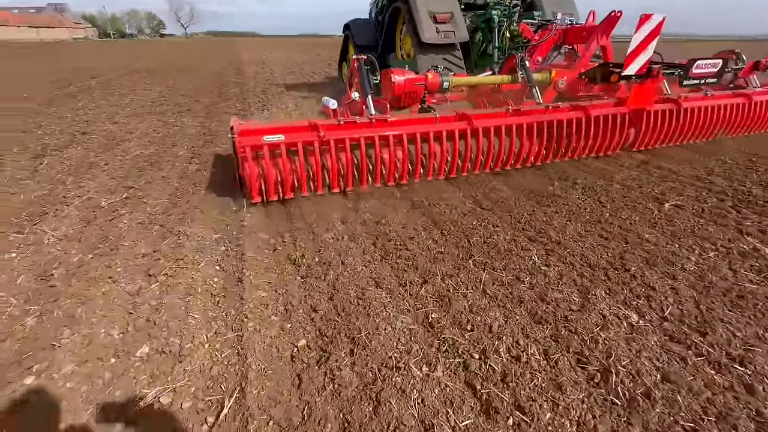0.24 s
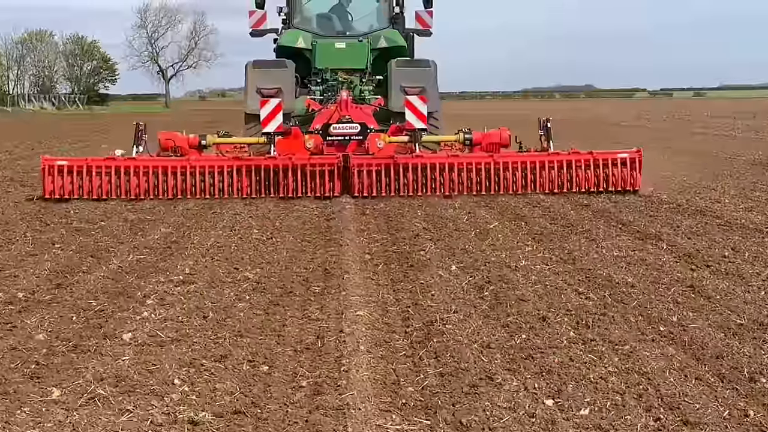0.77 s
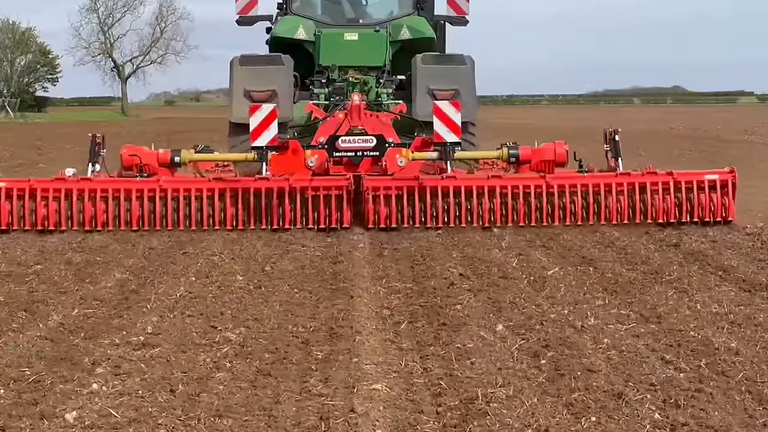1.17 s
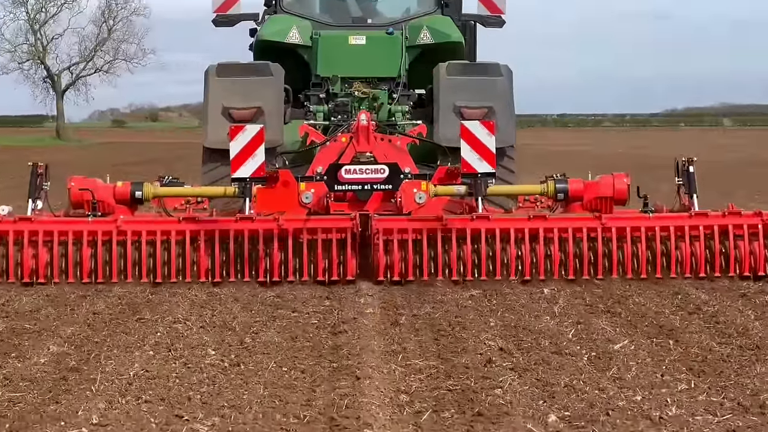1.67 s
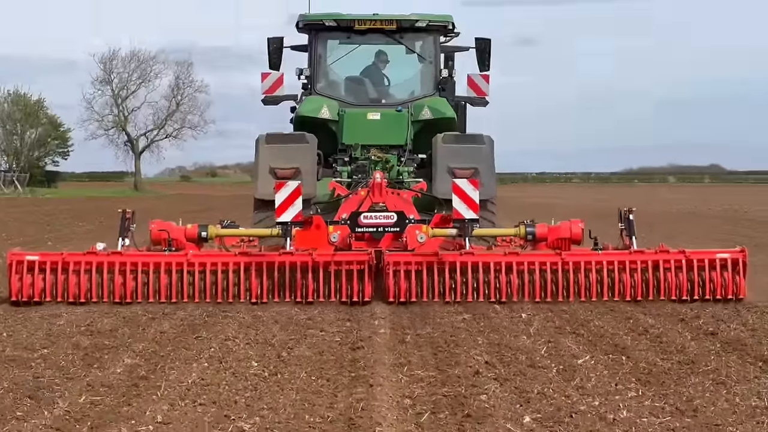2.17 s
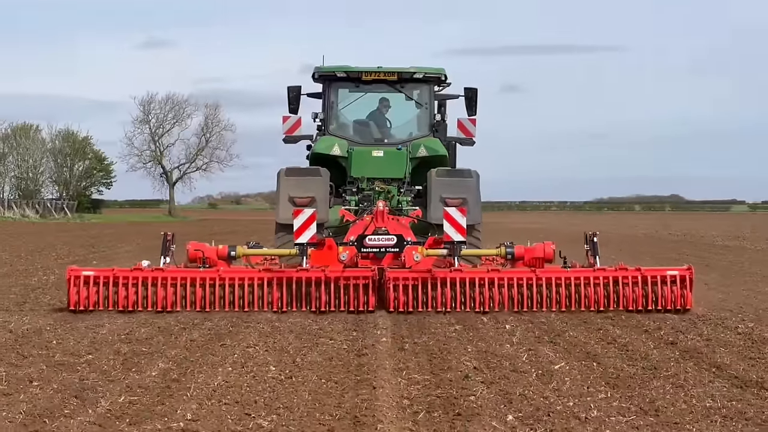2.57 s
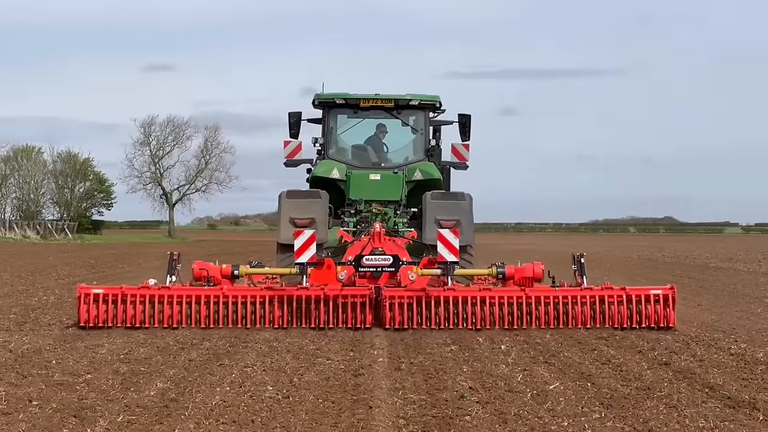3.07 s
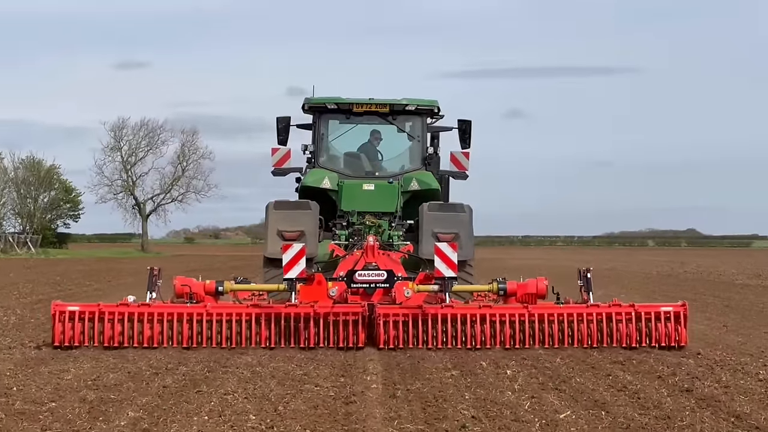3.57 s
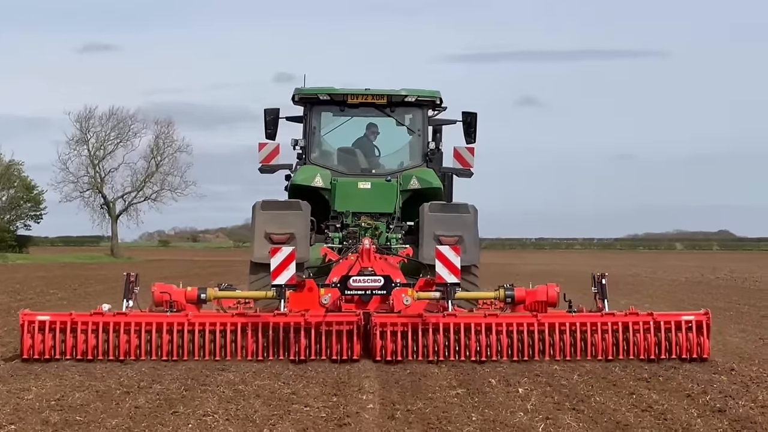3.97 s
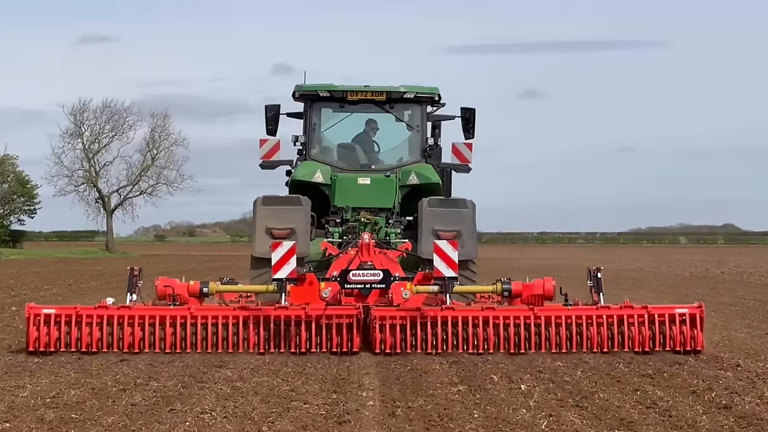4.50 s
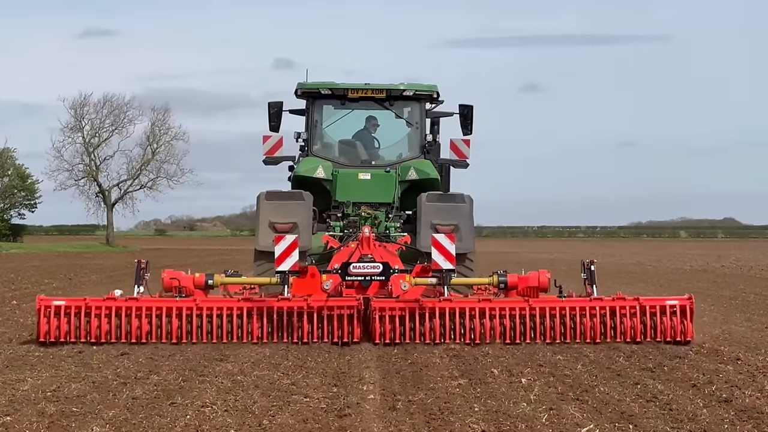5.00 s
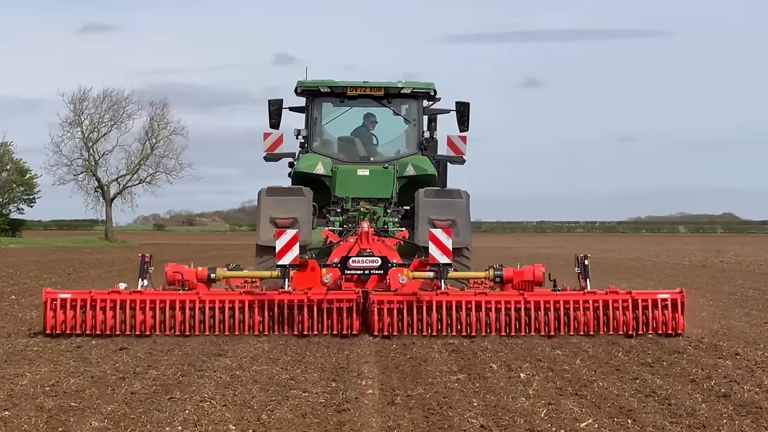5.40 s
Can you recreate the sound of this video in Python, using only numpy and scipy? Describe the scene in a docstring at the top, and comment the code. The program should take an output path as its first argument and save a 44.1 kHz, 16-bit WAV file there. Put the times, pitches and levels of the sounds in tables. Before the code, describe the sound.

From 0 to 0.3 s, a close, loud, coarse churn of rotors, steel and clods, with a short hiss of soil at the very start and another near 0.25 s. It cuts abruptly to a position behind the machine. From there a steady gear hum near 410 Hz, with fluttering, swelling overtones, and quiet engine tones sit within dense metallic clatter, rattle and dry crumbling soil, roughened by irregular little bursts. Deep wind gusts thump the microphone from about 0.35 to 2.7 s, with a lighter one near 3.1 s, then subside apart from a brief low buffet at 4.25 s. A stone scrapes and clinks at 1.1 s, with fainter ones near 2.9, 3.2 and 4.9 s. From about 2.6 to 3.7 s the hum thins and the treble dulls; both return by 3.85 s. The work continues steadily, slightly receding overall, to the end around 5.6 s. Open air, no room echo.

```python
"""Tractor with power harrow

A tractor pulls a power harrow through dry soil at steady speed, heard close beside it, then from behind.
Gears whine as fluttering tooth-mesh harmonics over diesel tones locked to the engine cycle.
Random knocks, coloured by the steel and the microphone, make churn, clatter, rattle and crumbling soil.
From behind, stones clink as scrapes with a ring, and wind buffets the microphone as low shaped noise.
The hum thins and the treble dulls for about a second midway, then both return."""
import sys
import numpy as np
from scipy import signal
from scipy.fft import rfft, irfft
from scipy.io import wavfile
from scipy.ndimage import uniform_filter1d, map_coordinates

SR = 44100
rng = np.random.default_rng(int(sys.argv[2]) if len(sys.argv) > 2 else 0)


def generate_wav(signal):
    """Clip the signal to [-1, 1] and save it as 16-bit WAV at the path in sys.argv[1]."""
    frames = np.transpose(np.atleast_2d(signal))
    scaled = np.clip(frames, -1, 1) * 32767
    pcm = np.round(scaled).astype(np.int16)
    wavfile.write(sys.argv[1], SR, pcm)


N = 249165   # length in samples

BEHIND_FROM_S = 0.299   # close beside before this moment, behind after it
TEETH_PER_CYCLE = 25   # gear teeth meeting in one four-stroke cycle

# Spectrum of crumbling and spraying soil as the microphone colours it, with treble peaks near 8, 11
# and 13.6 kHz. Each row: frequency in Hz, relative density in dB per Hz.
SOIL_SPECTRUM = [(2000, -7), (4000, 4.5), (5200, 2), (6800, -7), (8300, -3), (9200, -16), (11200, -8.5),
                 (12300, -18), (13600, -14.5), (15700, -24)]
# Thin, dull passage. Each row: time in seconds, thinning of the hum (1 is full, below 0 is fuller),
# dulling of the work noise (1 is full, below 0 is brighter).
DULLING_CURVE = [(1.95, 0, -.1), (2.48, 0, 0.27), (2.66, .95, 1), (3.42, 1, 0.76), (3.68, 0.14, 0.86),
                 (3.84, 0.14, -0.028), (4.25, 0, -0.19), (4.95, 0, -0.12), (5.15, 0.1, 0.025),
                 (5.45, -.15, -0.13)]


def from_db(db):
    """Decibels to gain."""
    return 10 ** (np.asarray(db) / 20)


def rms_one(x):
    """Scale to unit rms."""
    return x / np.sqrt(np.mean(x ** 2) + 1e-20)


def in_time(rows):
    """Draw each column of a timed table as a curve, sample by sample."""
    s, *columns = np.transpose(rows)
    return [np.interp(np.arange(N) / SR, s, column) for column in columns]


def passing(level, depth):
    """A layer's level in dB: a steady trend over time, less its loss at the given thinning or dulling."""
    start_db, db_per_s, loss_db = level
    return start_db + db_per_s * np.arange(N) / SR - loss_db * depth


def drift(rate_hz):
    """Smooth random wandering of spread 1: noise through two equal low-pass poles, drawn every 20 samples."""
    pole = np.exp(-40 * np.pi * rate_hz / SR)
    noise = rng.standard_normal(N // 20 + 4002)
    slow = signal.lfilter([1], [1, -2 * pole, pole * pole], noise)[4000:]   # skip the filter's start-up
    return np.interp(np.arange(N) / 20, np.arange(len(slow)), rms_one(slow))


def colour(x, spectrum, resonances=()):
    """Give a sound a broad spectrum with resonant lifts or dips on top; rms 1."""
    hz = np.maximum(np.arange(N // 2 + 1) * SR / N, 1)
    points_hz, points_db = np.transpose(spectrum)
    db = np.interp(np.log(hz), np.log(points_hz), points_db)
    # beyond the end points: 6 dB per octave down below, 12 above
    below, above = np.maximum(points_hz[0] / hz, 1), np.maximum(hz / points_hz[-1], 1)
    db = db - 20 * np.log10(below * above ** 2)
    for centre, width, lift_db in resonances:
        db = db + lift_db / (1 + (2 * (hz - centre) / width) ** 2)
    return rms_one(irfft(rfft(x) * from_db(db), N))


def impacts(per_s, spread_db):
    """Random small knocks of either sign and uneven size; rms 1."""
    sizes = from_db(spread_db * np.minimum(rng.exponential(1, N), 4))
    struck = rng.random(N) < per_s / SR
    return rms_one(sizes * rng.choice([-1, 1], N) * struck)


def grit(per_s, ring_s, spread_db, count):
    """Small pebbles each ping one of many high, decaying modes of the steel; rms 1."""
    pings, pole = 0, np.exp(-1 / (ring_s * SR))
    knocks = impacts(per_s, spread_db)
    dealt = rng.integers(0, count, N)   # which mode each knock excites
    for k, hz in enumerate(rng.uniform(2500, 15000, count)):
        w = 2 * np.pi * hz / SR
        resonator = [1, -2 * pole * np.cos(w), pole * pole]
        pings = pings + signal.lfilter([0, np.sin(w)], resonator, knocks * (dealt == k) + 1e-18)
    return rms_one(pings)


def bursts(per_s, decay_s):
    """Clods break at random: each adds a sudden spray up to 1.3 high that dies away; mean 0."""
    breaks = (rng.random(N) < per_s / SR) * rng.uniform(0, 1.3, N)
    spray = signal.lfilter([1], [1, -np.exp(-1 / (decay_s * SR))], breaks)
    return spray - spray.mean()


def close_harrow():
    """Beside the rotors, coloured knocks and pings make a churn, with smooth noise as soil spray."""
    # Nearby work. Each row: time in seconds, churn level in dB, soil spray level in dB.
    work_levels = [(0, -17, -24), (.1, -18, -38), (.13, -19.5, -52.5), (.17, -18, -48), (.21, -18.5, -47),
                   (.25, -18, -27), (.3, -18, -42)]
    # Churn's spectrum. Each row: frequency in Hz, relative density in dB per Hz.
    churn_spectrum = [(30, 1), (130, -1), (290, -8), (450, -5.5), (750, -4.5), (1080, -9), (1900, -2.5),
                      (2600, -6), (3500, -9), (5000, -15), (6800, -23.5), (8500, -18.5), (9300, -28.5),
                      (11300, -28), (15500, -38)]
    # Steel frame and rotor housing resonances; the peaks near 6 and 8 kHz are the microphone's colour.
    # Each row: centre in Hz, width in Hz, lift in dB (below 0 is a dip).
    steel_and_mic = [(835, 140, 7), (1280, 48, 3), (1625, 50, 7.5), (2670, 230, 4.5), (2940, 86, -8.5),
                     (3000, 38, 11.5), (3760, 38, 8), (4650, 32, 9.5), (6020, 170, 7), (7850, 420, 1)]
    churn_db, spray_db = in_time(work_levels)
    pings = grit(per_s=1600, ring_s=0.011, spread_db=6.0, count=40)
    clods = impacts(per_s=8000, spread_db=2.0) + from_db(-5.5) * pings
    churn = colour(clods, churn_spectrum, steel_and_mic)
    # too fine to hear single grains
    spray = colour(rng.standard_normal(N), SOIL_SPECTRUM, steel_and_mic)
    return from_db(churn_db) * churn + from_db(spray_db) * spray


def gears(cycle, flutter_hz, per_turn):
    """Three tooth-mesh harmonics, shaken by the tines' uneven load and throbbing once per engine cycle."""
    # Uneven load. Each row: time in seconds, flutter depth of the first harmonic as a share of its strength.
    load_shake = [(0, 0.44), (.35, 0.13), (2.2, 0.14), (2.5, 0.07), (3.0, 0.26), (4.0, 0.045),
                  (5.65, 0.053)]
    # First harmonic, a hum: start level in dB, change in dB per second as the tractor draws away,
    # loss at full thinning in dB.
    hum_level = (-36.8, -1.53, 18)
    # Second harmonic. Each row: time in seconds, level in dB.
    second_level = [(.5, -43), (.75, -46.5), (1.55, -48), (2.0, -43), (2.5, -43), (2.75, -46),
                    (3.78, -42.5), (3.93, -51), (5.65, -49)]
    # Third harmonic, which swells and fades. Each row: time in seconds, level in dB.
    third_level = [(.35, -32.5), (.48, -29.5), (.72, -37.5), (1.1, -35.5), (1.4, -36), (1.63, -43),
                   (1.84, -31), (1.98, -31), (2.1, -36), (2.53, -30), (2.68, -37.5), (3.68, -32),
                   (3.88, -38), (4.45, -33), (5.65, -35.5)]
    shake, = in_time(load_shake)
    thin, _ = in_time(DULLING_CURVE)
    levels_db = [passing(hum_level, thin), *in_time(second_level), *in_time(third_level)]
    whine = 0
    for k, level_db in enumerate(levels_db, 1):
        depth = shake * k   # higher harmonics feel the same twist more
        flutter = depth * (drift(flutter_hz) + 1j * drift(flutter_hz))   # in strength and phase
        wobble = 1 + flutter + per_turn * k * np.sin(cycle)
        tone = np.real(wobble * np.exp(1j * k * TEETH_PER_CYCLE * cycle))
        steady = tone / np.sqrt(1 + 2 * depth ** 2)   # deep flutter adds no loudness
        whine = whine + from_db(level_db) * rms_one(steady)
    return whine


def engine(cycle, waver_db, phase_wander):
    """Engine and drive line tones locked to the engine cycle, each wavering at random in level and phase."""
    # Tones. Each row: multiple of the four-stroke cycle rate, level in dB before the steady fade.
    orders = [(6, -53), (9, -49.5), (12, -57.5), (32, -56), (56, -70), (63, -47), (88, -50.5), (94, -47),
              (99, -46), (113, -49.5), (126, -45.5), (133, -53), (152, -48), (190, -50)]
    fade_db_per_s = -0.49   # as the tractor draws away
    tones = 0
    for order, level_db in orders:
        tone = np.sin(order * cycle + phase_wander * drift(7))
        tones = tones + from_db(level_db) * rms_one(tone * from_db(waver_db * drift(4.0)))
    return from_db(fade_db_per_s * np.arange(N) / SR) * tones


def harrow(cycle):
    """Dense coloured knocks clatter and rattle under crumbling soil; rattle and soil buzz with the firing."""
    # Spectra of clatter and rattle. Each row: frequency in Hz, relative density in dB per Hz.
    clatter_spectrum, rattle_spectrum = [(100, -1.5), (220, -11), (340, -16), (450, -2), (700, -2.5),
                                         (1000, -2), (1400, -7.5), (1700, 0), (2200, 1), (2700, 2),
                                         (3500, -14.5), (6000, -27)], [(1500, -52), (2500, 4.5), (2900, 3.5),
                                                          (3500, -0.5), (4100, -4), (4800, -9.5),
                                                          (6000, -33.5), (9000, -43)]
    # Steel frame and rotor housing resonances; the peaks near 6 and 8 kHz are the microphone's colour.
    # Each row: centre in Hz, width in Hz, lift in dB (below 0 is a dip).
    steel_and_mic = [(817, 41, 6), (1230, 94, 11.5), (1537, 66, 8), (1652, 27, 9), (1976, 74, 1.5),
                     (2440, 70, -3), (2624, 128, -16.5), (3050, 12, 7.5), (3432, 70, 11.5), (3738, 65, 8.5),
                     (4724, 180, 5.5), (6110, 390, 5.5), (8200, 220, 1)]
    # Layer levels, each: start level in dB, change in dB per second, loss at full dulling in dB.
    clatter_level, rattle_level = (-29, -0.96, 1.4), (-37, 0.53, 4.4)
    soil_level = (-39, -0.47, 7.8)
    _, dull = in_time(DULLING_CURVE)
    clods = bursts(per_s=15, decay_s=0.02)   # a breaking lump loads every part at once
    firing = np.cos(6 * cycle)   # six cylinders fire in each cycle

    clatter_swell_db = 0.5 * clods + 0.52 * drift(22)
    clatter_knocks = impacts(per_s=12000, spread_db=1.1) * from_db(clatter_swell_db)
    clatter = colour(clatter_knocks, clatter_spectrum, steel_and_mic)

    rattle_swell_db = 1.5 * clods + 0.63 * drift(34) + 0.37 * firing
    rattle_knocks = impacts(per_s=4000, spread_db=1.0) * from_db(rattle_swell_db)
    rattle = colour(rattle_knocks, rattle_spectrum, steel_and_mic)

    pings = grit(per_s=1400, ring_s=0.016, spread_db=2.5, count=90)
    crumbs = impacts(per_s=14000, spread_db=3.0) + from_db(-8) * pings
    soil_swell_db = 2.4 * clods + 0.5 * drift(36) + 0.42 * firing
    soil = colour(crumbs * from_db(soil_swell_db), SOIL_SPECTRUM, steel_and_mic)
    high_pass = signal.butter(2, 9000, "high", fs=SR, output="sos")
    fines = signal.sosfiltfilt(high_pass, soil)
    puffs = from_db(2.6 * bursts(per_s=15, decay_s=0.025))
    soil = soil + fines * (puffs - 1)   # dry sand flies off in puffs of its own

    work = from_db(passing(clatter_level, dull)) * clatter
    work = work + from_db(passing(rattle_level, dull)) * rattle
    return work + from_db(passing(soil_level, dull)) * soil


def ground_bounce(x):
    """Sound skimming the soil arrives just after the direct path and sweeps a soft comb through it."""
    # Bounce as the microphone moves. Each row: time in seconds, delay in ms, strength against the direct path.
    bounce = [(2.0, 0.69, 0.08), (2.8, 0.68, 0.17), (3.3, 0.57, 0.082), (3.8, 0.69, .04), (4.2, 0.63, 0.26),
              (4.65, 0.57, 0.079), (4.95, 0.49, 0.2), (5.15, 0.51, 0.18), (5.4, 0.7, 0.16)]
    delay_ms, strength = in_time(bounce)
    late = map_coordinates(x, [np.arange(N) - delay_ms * SR / 1000], order=3)
    return (x + strength * late) / np.sqrt(1 + strength ** 2)


def stones(ring_s, wander_hz):
    """A stone skids along a tine: scrape noise and a wavering ring build up together, then die away."""
    # Stones. Each row: peak time in seconds, ring pitch in Hz, ring level in dB, scrape level in dB,
    # build-up time in seconds.
    strikes = [(1.074, 4650, -34, -25, 0.0075), (2.855, 5770, -42, -31.5, 0.011),
               (3.23, 5780, -39, -35, .003), (4.86, 8200, -44, -34, 0.022)]
    # Scrape's spectrum. Each row: frequency in Hz, relative density in dB per Hz.
    scrape_spectrum = [(700, -2), (2500, -1), (5000, -8), (12000, -34)]
    clinks, t = np.zeros(N), np.arange(N) / SR
    scrape = colour(rng.standard_normal(N), scrape_spectrum)
    wander = drift(wander_hz)
    for s, hz, ring_db, scrape_db, rise_s in strikes:
        ring = np.sqrt(2) * np.sin(2 * np.pi * hz * t + wander)
        time_scale = np.where(t < s, rise_s, ring_s)
        envelope = np.exp(-np.minimum(np.abs(t - s) / time_scale, 20))
        clinks += envelope * (from_db(ring_db) * ring + from_db(scrape_db) * scrape)
    return clinks


def turbulence(level_db, spectrum):
    """Low noise, evened out over an eighth of a second, whose strength follows a level in dB."""
    eddies = colour(rng.standard_normal(N), spectrum)
    power = uniform_filter1d(eddies ** 2, SR // 8)
    return from_db(level_db) * eddies / np.sqrt(power + 1e-6)


def wind():
    """Deep gusts on the microphone, and above them a roar that follows their strength."""
    # Gust strength. Each row: time in seconds, level in dB.
    gust_level = [(.3, -34), (.36, -19.5), (.56, -24.5), (.67, -14.5), (.87, -22.5), (.97, -14.5),
                  (1.24, -22), (1.86, -15), (2.06, -20), (2.43, -16.5), (2.51, -12.5), (2.71, -17.5),
                  (2.78, -25), (3.03, -29.5), (3.12, -20), (3.65, -26.5), (4.8, -30), (5.65, -31.5)]
    # Spectra of the gusts and the low roar. Each row: frequency in Hz, relative density in dB per Hz.
    gust_spectrum, roar_spectrum = [(10, 5.5), (20, 5), (32, -3), (48, -1), (65, -21.5), (100, -24),
                                    (200, -56)], [(40, 1.5), (65, 2), (85, -1.5), (110, -7.5), (160, -9.5),
                                                  (250, -20), (350, -28.5), (700, -55)]
    # Short buffets in the roar. Each row: peak time in seconds, lift in dB, half length in seconds.
    buffets = [(0.806, 8, 0.049), (4.25, 8.5, 0.022)]
    wind_db, = in_time(gust_level)
    t = np.arange(N) / SR
    buffet_db = sum(lift_db * np.exp(-((t - s) / half_s) ** 2) for s, lift_db, half_s in buffets)
    roar_db = -21 + 0.52 * wind_db + buffet_db   # follows about half of the wind's swing in dB
    return turbulence(wind_db, gust_spectrum) + turbulence(roar_db, roar_spectrum)


def scene():
    """Close beside the harrow for a moment, then following behind it."""
    # Tooth-mesh pitch, nearly steady. Each row: time in seconds, frequency in Hz.
    mesh_pitch = [(.29, 414), (.3, 409.4), (1.5, 409.6), (2.3, 410), (3.2, 409.8), (4.0, 409.2),
                  (4.9, 409.3), (5.5, 410.3)]
    t = np.arange(N) / SR
    mesh_hz, = in_time(mesh_pitch)
    cycle = 2 * np.pi * np.cumsum(mesh_hz / TEETH_PER_CYCLE) / SR   # phase of the four-stroke cycle
    whine = gears(cycle, flutter_hz=30, per_turn=0.0076)
    machine = whine + engine(cycle, waver_db=2.5, phase_wander=0.2)
    beside = close_harrow() + from_db(-2) * machine
    behind = machine + ground_bounce(harrow(cycle)) + stones(ring_s=0.013, wander_hz=130) + wind()
    return np.where(t < BEHIND_FROM_S, beside, behind)[None]


def record(dry):
    """A steep elliptic low-pass cuts the top above 15.7 kHz."""
    low_pass = signal.ellip(12, 0.1, 80, 15700, fs=SR, output="sos")
    return signal.sosfilt(low_pass, dry)


dry = scene()
out = record(dry)
generate_wav(out)
```